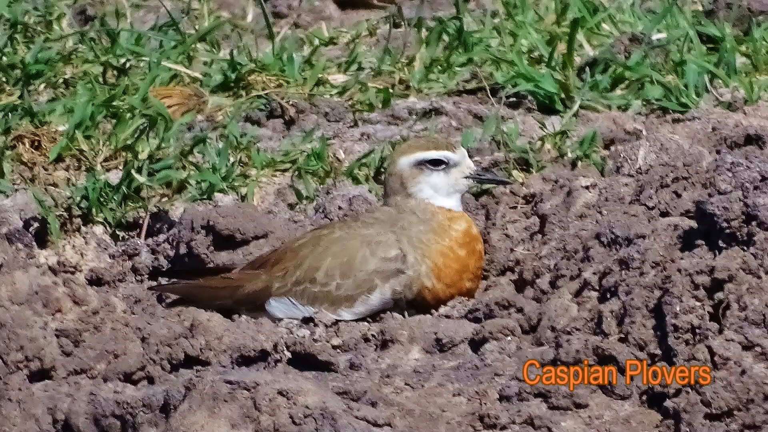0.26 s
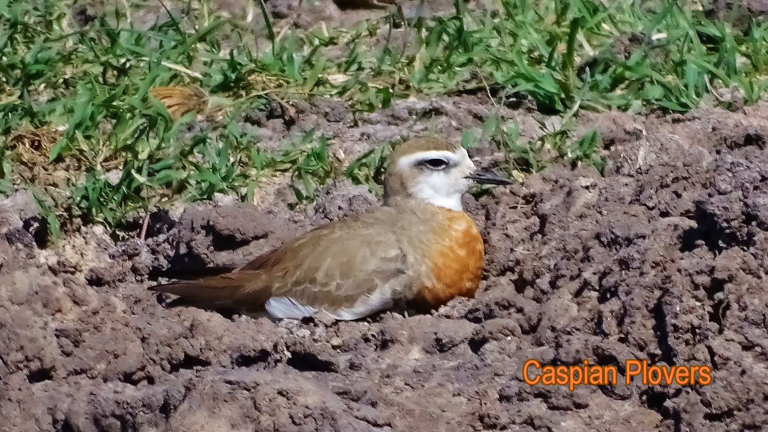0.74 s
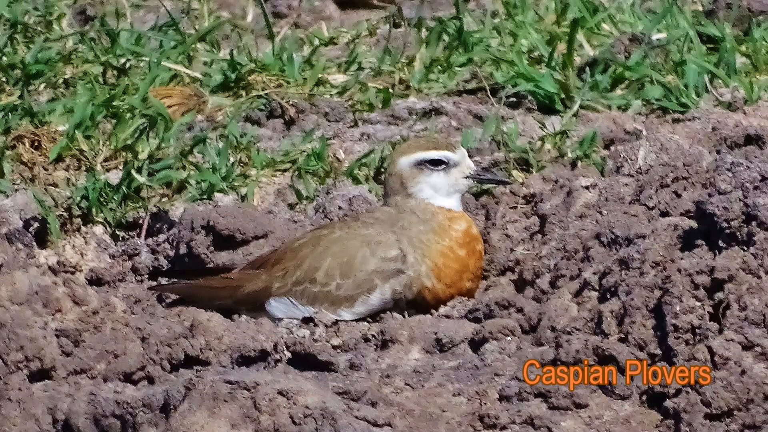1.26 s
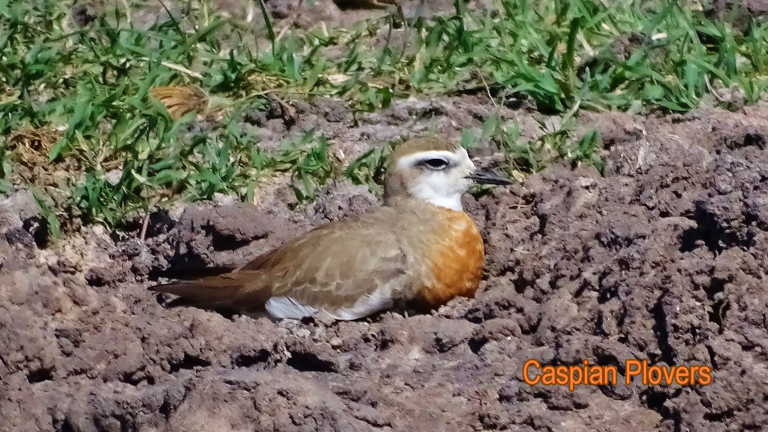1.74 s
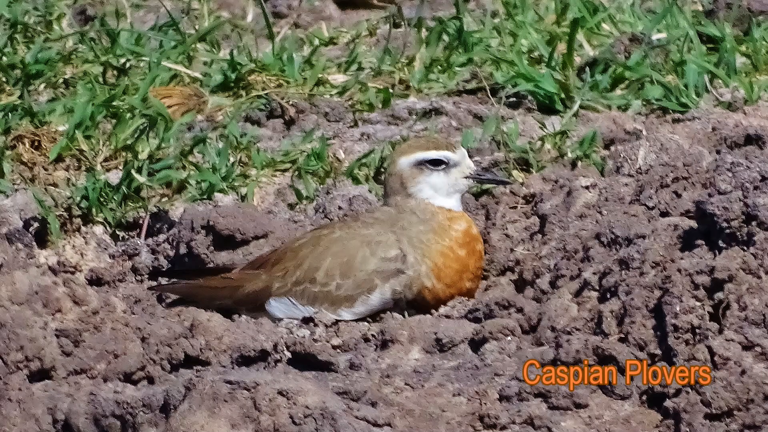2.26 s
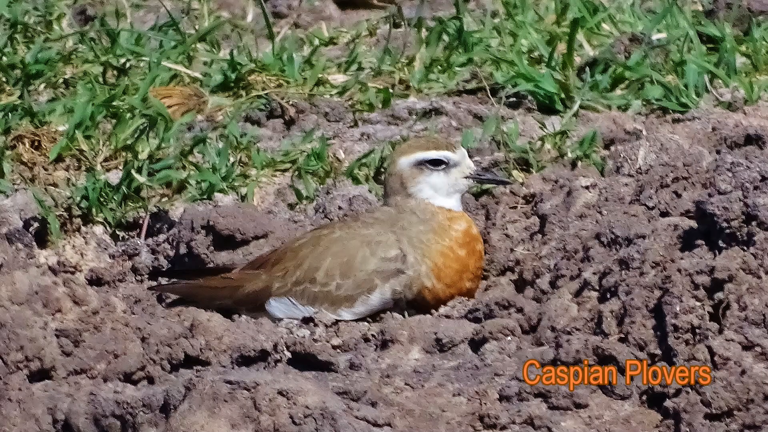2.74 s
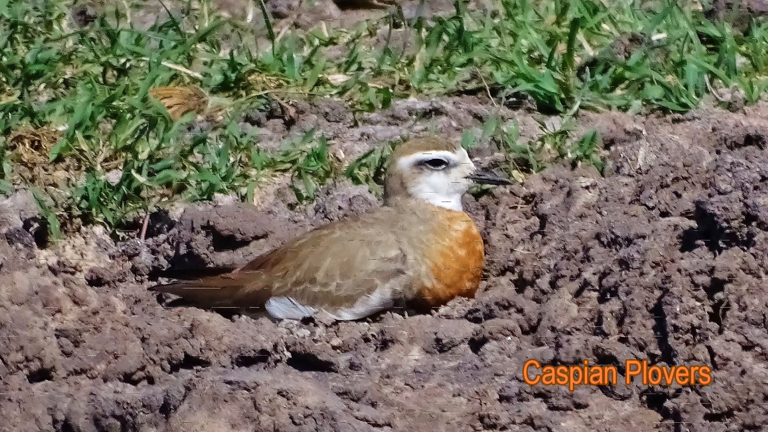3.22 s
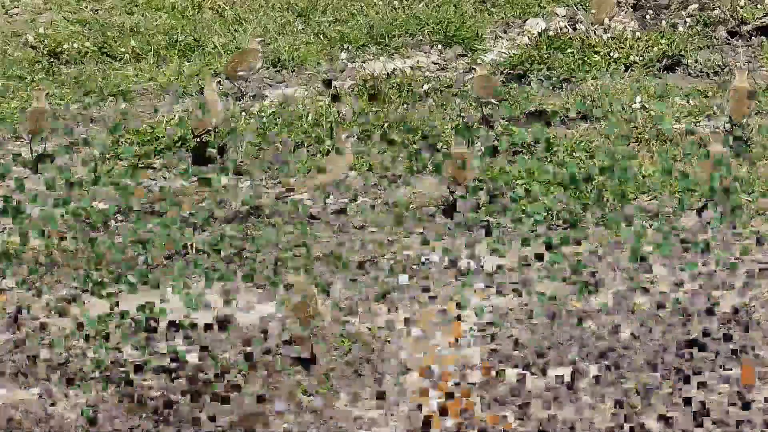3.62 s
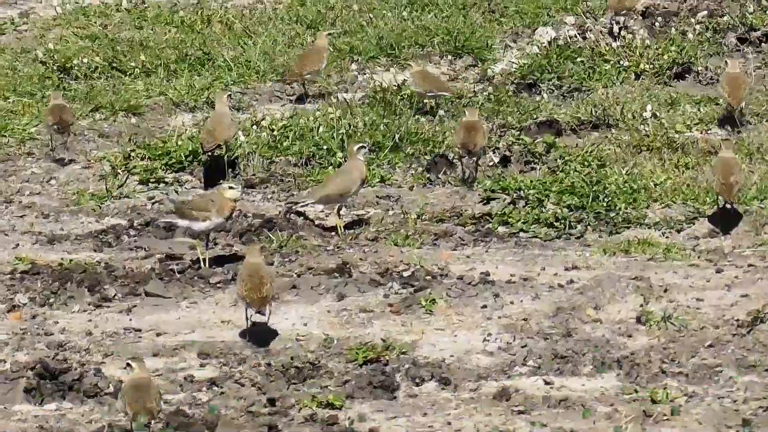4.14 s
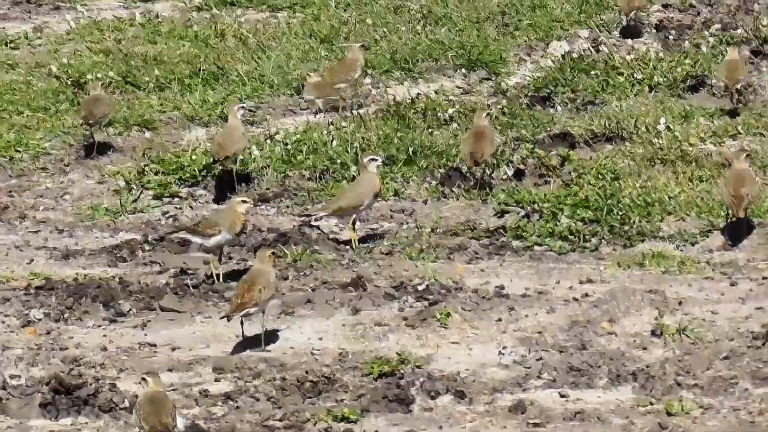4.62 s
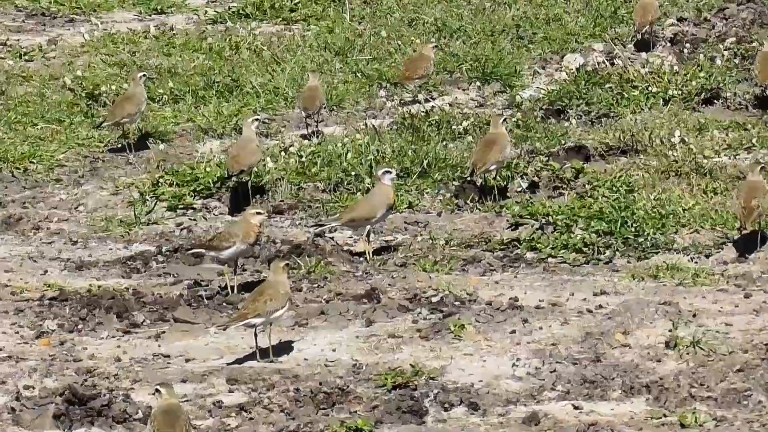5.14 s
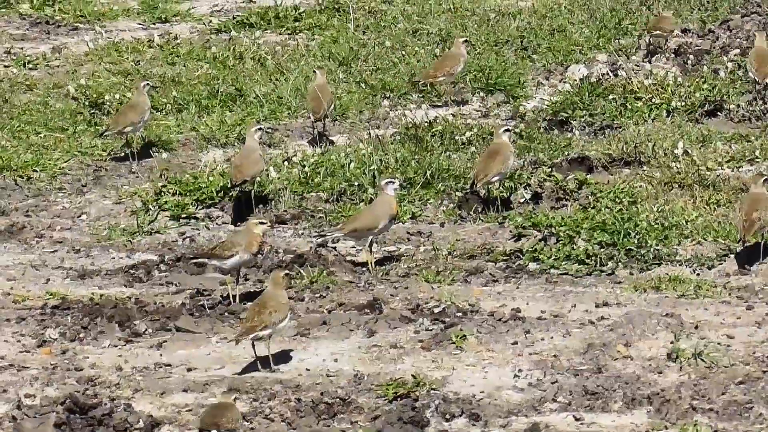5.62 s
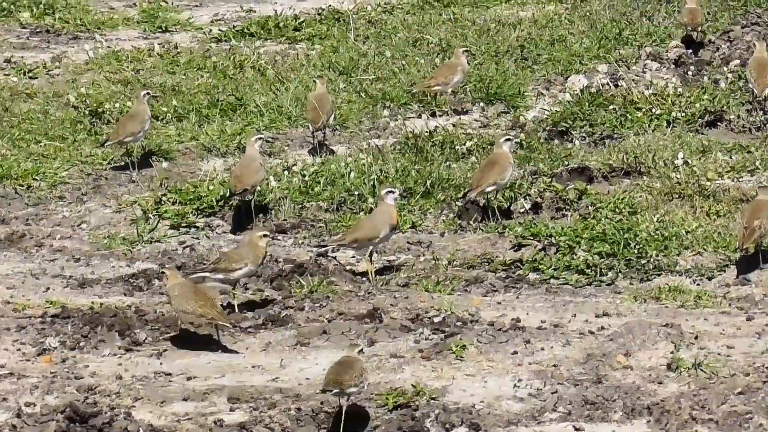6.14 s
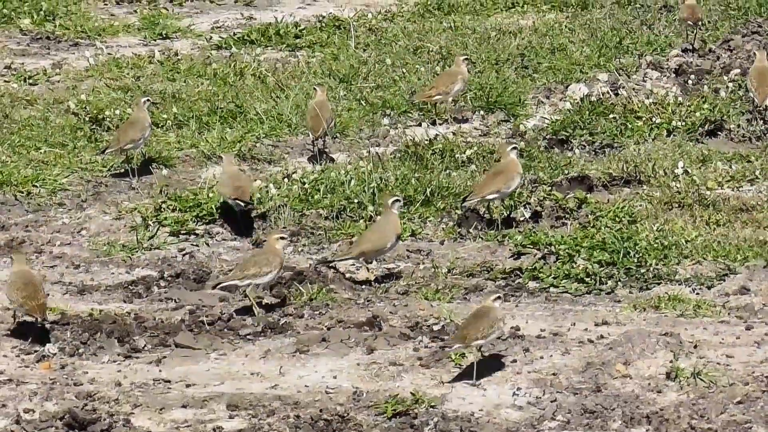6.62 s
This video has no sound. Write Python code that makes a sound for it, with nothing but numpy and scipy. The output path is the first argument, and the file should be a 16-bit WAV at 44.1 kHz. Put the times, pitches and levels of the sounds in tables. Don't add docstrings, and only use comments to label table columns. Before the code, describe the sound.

Small wading birds whip out sharp, high warbled chirps over a breezy, hissing grassland, with far songbird twitter and a soft dove cooing and rolling behind.

```python
import sys
import numpy as np
from scipy import signal
from scipy.fft import rfft, irfft
from scipy.io import wavfile
from scipy.ndimage import uniform_filter1d, map_coordinates

SR = 44100
rng = np.random.default_rng(int(sys.argv[2]) if len(sys.argv) > 2 else 0)


def invert_db(level):
    return 10 ** (np.asarray(level, dtype=float) / 20)


def dump_mix(stems):
    frames = np.atleast_2d(stems).T
    limited = np.clip(frames, -1, 1)
    pcm = np.round(limited * 32767).astype(np.int16)
    wavfile.write(sys.argv[1], SR, pcm)


N = 302967

# [f/Hz, density/dB]
AIR_SPECTRUM = [(15, -28), (25, -16.5), (191, 0), (407, -6), (540, -7), (763, -5.5), (989, -8), (1490, -16),
                (1770, -11), (2400, -19.5), (3050, -19.5), (4400, -23), (5720, -41), (9680, -120)]
# [f/Hz, density/dB]
GRASS_SPECTRUM = [(2590, -42.5), (4300, -29), (4850, -7.5), (5730, -4), (6410, -9), (7140, -18),
                  (7610, -23), (8050, -13.5), (8850, -3), (11000, -4.5), (13000, -10), (14800, -15),
                  (15900, -17)]
# [t/s, level/dB]
GRASS_SWELL = [(0, -55.5), (.3, -54), (.6, -50), (.9, -52.5), (1.2, -57), (1.6, -57), (2.0, -52.5),
               (2.4, -55.5), (3.2, -54), (4.2, -54), (5.2, -54), (6.0, -56), (6.87, -51)]
# [f/Hz, likeness 0..1]
EAR_LIKENESS = [(30, 0.3), (150, 0.99), (350, 0.71), (1500, 0.88), (3000, 1), (7000, 0.7), (9000, 0.7),
                (14000, 0.89)]
EARS = np.array([[.5], [-.5]])
# [t/ms, f/Hz, level/dB]
CROSSING_VOICES = [
    [(0, 6400, -15), (12, 5300, -5), (21, 4200, -7)],
    [(4, 2950, -17), (20, 4000, 0), (26, 3500, -6), (36, 3150, 3), (57, 2150, -12), (67, 2300, -12),
     (72, 3150, 2), (79, 3150, 4), (83, 2500, -13), (97, 1900, -16), (120, 1600, -21)],
    [(52, 4250, -18), (62, 4350, -16), (70, 4900, -21)],
    [(80, 4100, -7), (87, 4350, -10), (95, 3850, -4), (103, 3650, -3), (113, 3250, -11), (122, 3100, -6),
     (130, 3300, -13)],
    [(128, 2200, -10), (150, 3050, -13)],
]
# [t/ms, f/Hz, level/dB]
TUMBLING_VOICES = [
    [(13, 2700, -16), (24, 3350, -3), (29, 3050, -8), (33, 3250, 0), (37, 2700, -12), (46, 2250, -18)],
    [(37, 4450, -14), (44, 4600, -2), (51, 4300, -5), (57, 3750, -2), (64, 3200, 3), (78, 2950, -5),
     (85, 2600, -10), (89, 1850, -15), (103, 1600, -17)],
    [(92, 3300, -14), (101, 3250, -8), (115, 3000, -14)],
    [(124, 2350, -9), (146, 2900, -18)],
]
# [start t/s, level/dB, tempo stretch]
CROSSINGS = [
    (.923, -32.8, 1.0),
    (3.149, -41, 1.05),
]
# [start t/s, level/dB, tempo stretch]
TUMBLINGS = [
    (-.053, -34.5, 1.0),
    (2.398, -35, 1.0),
    (5.41, -40, 1.0),
]
# [start t/s, length/ms, start f/Hz, end f/Hz, level/dB]
FALLS = [(2.615, 36, 5170, 4150, -58), (3.888, 75, 5250, 3730, -53.5), (2.398, 7, 6440, 2980, -41),
         (4.421, 28, 6570, 5160, -41), (4.609, 70, 8900, 8720, -49), (4.7, 110, 9250, 9060, -53),
         (4.894, 16, 5300, 4100, -50), (4.91, 12, 4100, 2300, -56), (5.092, 56, 4500, 2840, -51.5),
         (5.39, 20, 5060, 3660, -49), (5.449, 12, 5400, 4100, -48), (5.49, 9.7, 2910, 2200, -49),
         (5.583, 20, 3950, 2890, -57.5), (5.393, 8, 6400, 5800, -52), (3.13, 15, 5600, 3400, -57),
         (3.152, 21, 6200, 4290, -44), (3.245, 34, 1900, 1550, -55), (3.241, 22, 4410, 3390, -48),
         (4.33, 18, 5170, 2900, -53), (.945, 8.8, 3880, 3100, -40), (3.668, 8, 3500, 2800, -39),
         (6.452, 12, 4000, 3700, -51), (6.694, 6, 4000, 2600, -50), (0.004, 7, 4400, 3500, -37),
         (.018, 10, 4700, 3700, -49), (.02, 6, 2900, 2400, -48), (3.684, 5.6, 4600, 3400, -43),
         (5.801, 40, 4020, 2160, -51), (5.985, 35, 3730, 2400, -59.5), (6.195, 72, 4170, 2640, -56.5),
         (6.438, 13, 6600, 4000, -49), (6.48, 33, 5000, 4880, -47.5), (6.733, 31.5, 4310, 2560, -44.5)]
# [start t/s, length/ms, start f/Hz, end f/Hz, level/dB]
RISES = [(2.16, 28, 4450, 4700, -59), (2.198, 30, 5200, 4950, -52), (4.6, 26, 3000, 3450, -57),
         (0.89, 16.3, 4700, 4900, -54), (3.218, 14, 2100, 3100, -50), (2.685, 21.5, 3860, 4900, -54),
         (2.72, 36, 3650, 3750, -58), (3.635, 31, 3940, 4420, -55), (3.955, 20, 3960, 4480, -58),
         (3.974, 10, 4580, 5300, -39), (4.352, 24, 2870, 3850, -43.5), (4.378, 6.2, 3500, 3620, -46),
         (3.28, 22.4, 1700, 2500, -60), (5.428, 10, 3200, 3850, -42), (5.1, 25, 3500, 4100, -55),
         (4.8, 31, 4250, 4500, -54.5), (4.843, 10, 4060, 5200, -52), (4.675, 22, 8720, 9300, -49),
         (5.155, 25.4, 2860, 3700, -51.5), (6.158, 24, 2980, 3570, -60.5), (6.27, 43, 2600, 3120, -54),
         (6.345, 69, 3600, 4050, -57), (6.56, 51, 2950, 3600, -53.5), (6.575, 46, 2750, 3420, -59),
         (6.6, 88, 3540, 3930, -49.5), (6.684, 12, 3630, 4540, -47), (6.3, 29, 2390, 2510, -55),
         (3.862, 22, 3220, 3700, -55.5)]
# [start t/s, length/ms, ends f/Hz, mid-note f/Hz, level/dB]
ARCHES = [(3.32, 20, 3950, 3800, -53), (3.354, 17, 4400, 4620, -54), (1.002, 8, 4360, 4300, -45),
          (3.34, 12, 4000, 4150, -59), (3.392, 15, 4680, 4860, -45), (3.416, 18, 4600, 4870, -43.5),
          (3.994, 32, 3130, 3520, -52), (4.44, 20, 4050, 4390, -50), (4.853, 42, 5280, 5420, -47),
          (5.853, 18, 2260, 2780, -52), (3.455, 20, 4800, 4900, -55), (6.513, 14, 8300, 8350, -49),
          (6.698, 12, 8900, 9000, -55), (.898, 15, 5350, 5450, -49), (5.44, 34, 3750, 3850, -52),
          (3.172, 9.4, 3190, 3600, -44)]
# [t/s, peak level/dB, f/Hz]
TAPS = [(0.061, -40, 1300), (0.473, -39.5, 1190), (0.99, -54, 2300), (1.004, -32.5, 950),
        (1.169, -34, 1050), (1.025, -42, 1000), (3.125, -46, 1800), (3.29, -43, 1100), (3.393, -37, 1500),
        (3.44, -43, 1400), (5.457, -46, 1700), (5.605, -45, 1300), (3.32, -28, 1030), (3.388, -32, 1750),
        (3.417, -32, 900), (2.226, -47, 1700), (3.557, -43, 1900), (3.612, -38, 1900), (3.75, -44, 1500),
        (3.799, -39, 1010), (3.8, -37, 2500), (3.801, -39.5, 486), (5.478, -42, 721), (5.544, -35, 1100),
        (5.585, -43.5, 836), (5.741, -38, 1110), (5.841, -38.5, 1170), (6.179, -40, 796), (6.406, -38, 830),
        (6.492, -37, 850), (6.662, -36.5, 939), (6.677, -35, 980)]
# [t/s, peak level/dB]
SNAPS = [(.062, -36), (.104, -35), (.1856, -33), (.3393, -34), (.4086, -33), (.5892, -37), (0.664, -32),
         (1.61, -31), (1.102, -32), (2.048, -26.5), (2.18, -31), (2.685, -30), (3.088, -27),
         (3.1834, -24.5), (3.204, -19), (3.5576, -21), (5.3323, -32.5), (5.4191, -32), (5.478, -29.5),
         (5.547, -28), (5.581, -31), (5.8007, -32), (6.49, -24.5)]
# [t/s, peak level/dB]
BUMPS = [
    (0.472, -23.5),
    (1.117, -24),
    (3.18, -31),
    (3.388, -22),
    (3.808, -25),
    (5.285, -27.5),
    (6.179, -27),
    (6.331, -25),
]
# [start t/s, echo level/dB, left-right difference/dB, rasp level/dB]
PLACES = [(1.137, -15.5, 0.5, -6.5), (2.295, -7, 3.5, -4), (2.764, -14.5, 0.5, -7), (3.662, -12, 3, -0.5),
          (4.24, -12, 3, 0), (4.374, -8, 1.2, -20.0), (4.42, -9, 1, -17), (4.706, -2, -4, -2),
          (4.979, -13, 3, -2.5), (5.861, 0.5, 2, -10), (6.27, 1, 4, -20.0), (6.39, -6, 1.5, -20.0),
          (6.467, -6, 1.5, 2), (6.711, 9, 4, -31)]
# [start t/s, start f/Hz, hold f/Hz, first dip f/Hz, later dips f/Hz]
CHIRPS = [
    (1.14, 5584, 5700, 4287, 5720),
    (2.3, 6430, 5260, 4270, 4840),
    (2.765, 5320, 5570, 4280, 5730),
    (3.6636, 6870, 5240, 2850, 5035),
    (4.239, 6430, 7140, 6440, 5160),
    (4.98, 5823, 5560, 3570, 5100),
    (5.865, 6150, 5476, 3870, 5140),
    (6.711, 5320, 5190, 4310, 4910),
]
# [tempo stretch, opening level/dB, middle level/dB, closing level/dB, octave level/dB]
BURSTS = [
    (1.2, -18, -11, -24, -21),
    (1.01, -24, -22, -21.5, -16),
    (1.2, -18, -9, -16, -16),
    (1.02, -12, -13, -30, -11.5),
    (1.04, -9, -15, -22, -11),
    (.99, -8, -9, -9.5, -11),
    (1.02, -19.5, -26.5, -16.5, -18),
    (1.02, -30.5, -26.5, -33.5, -29),
]
TURNS_MS = [0, 4.5, 8.5, 15, 22, 28, 33.5, 38, 46]
# [f/Hz, lead per difference/(rad/dB)]
PORTS = [(4500, 0.15), (5900, .43), (7200, 0.75), (7400, -1.5), (10300, 0.1), (14000, -0.2)]
# [centre t/s, length/ms, start f/Hz, end f/Hz, peak level/dB]
STROKES = [(4.377, 3.3, 3700, 6200, -28), (4.3855, 3.5, 3600, 6300, -29), (4.452, 5.5, 5380, 6400, -29),
           (4.475, 8.5, 6500, 5900, -32), (4.7125, 5.2, 5300, 5100, -35), (4.729, 4.6, 5430, 5100, -33),
           (4.7405, 4.7, 5440, 5350, -41), (4.757, 8.7, 4780, 5400, -34), (4.775, 3.8, 5200, 5350, -32),
           (6.276, 5.7, 5180, 5460, -36.5), (6.4, 10, 5640, 6160, -37), (6.415, 5.7, 5920, 6740, -26),
           (6.472, 7.1, 6760, 5040, -22), (6.509, 2.9, 5700, 6800, -16)]
# [centre t/s, length/ms, start f/Hz, end f/Hz, peak level/dB]
SWELLS = [(1.1442, 4.6, 5750, 5480, -9.5), (1.148, 1.6, 5320, 5030, -13.5), (1.153, 1.3, 5400, 6200, -11),
          (1.1642, 3.6, 6070, 5600, -4), (1.1763, 4, 6200, 6000, -15.5), (2.7681, 3.9, 5390, 5440, -6),
          (2.777, 1.56, 5370, 5860, -6.5), (2.7872, 4.3, 6240, 5580, -3), (2.8003, 3.5, 5600, 6500, -4.5),
          (2.804, 1.7, 6200, 6160, -8), (3.665, 2.2, 6500, 5860, -4), (3.6682, 2.6, 5940, 5240, -7.5),
          (3.681, 2.2, 6540, 6000, -6), (3.683, 1.9, 6070, 5460, -7), (3.6855, 4.05, 5300, 5180, -6.5),
          (3.6883, 2.5, 5500, 6250, -4.5), (3.689, 4, 6130, 6370, -7), (4.2435, 8, 6270, 5500, -19),
          (4.249, 5, 6400, 6550, -14), (4.254, 5, 6570, 6940, -8), (4.263, 4, 5310, 5560, -7.5),
          (4.2665, 2.5, 5930, 5600, -12), (4.272, 3.1, 5340, 5200, -8), (4.2745, 2.1, 5120, 5970, -9.5),
          (4.2798, 1.6, 5530, 5870, -15), (4.984, 5.4, 5652, 5370, 1), (4.991, 2.8, 5200, 5900, -1.5),
          (4.9989, 3.5, 6250, 5200, -10), (5.0021, 2, 4980, 5860, -7), (5.006, 5, 5860, 5400, -12),
          (5.0108, 2.6, 5700, 5100, -2.5), (5.0146, 2.15, 5200, 5870, -3.5), (5.018, 5, 6320, 6380, -7),
          (5.024, 5.1, 5980, 5700, -12.5), (5.03, 6, 5900, 5470, -15), (5.868, 2.85, 5920, 5470, -17)]
# [centre t/s, length/ms, start f/Hz, end f/Hz, peak level/dB]
CRESTS = [
    (1.158, 8.6, 8700, 8060, -24),
    (1.170, 7, 8000, 8640, -22),
    (2.781, 5, 8300, 8300, -22),
    (2.793, 4, 8200, 8500, -26),
    (4.9955, 3, 8000, 8500, -24),
    (5.0062, 4.4, 8400, 8400, -18),
    (3.667, 8, 14500, 8800, -20),
    (3.682, 5.7, 15000, 10000, -17),
    (4.9975, 4.5, 15200, 10800, -17),
    (4.2555, 4, 8800, 9000, -26),
]
# [start t/s, length/ms, mid-coo f/Hz, level/dB]
COOS = [
    (1.272, 100, 960, -54),
    (3.105, 103, 970, -52.5),
    (4.54, 103, 930, -58.5),
    (4.782, 69, 920, -53.5),
    (5.965, 89, 887, -55),
    (6.18, 64, 864, -55),
]
# [start t/s, last pulse t/s, f/Hz, level/dB, pulse rate/Hz]
ROLLS = [
    (1.512, 1.895, 820, -45, 30.5),
    (3.33, 3.713, 820, -46, 30),
    (4.86, 5.177, 820, -47, 30.5),
    (6.26, 6.578, 820, -49, 29.5),
]


def unit(x):
    return x / np.sqrt(np.mean(x ** 2) + 1e-20)


def along(points, hz):
    f, v = np.transpose(points)
    return np.interp(np.log(hz + 1), np.log(f + 1), v)


def add(track, s, sound):
    part = track[..., max(round(s * SR), 0):][..., :sound.shape[-1]]
    part += sound[..., :part.shape[-1]]


def tone(hz, octave_db):
    phase = 2 * np.pi * np.cumsum(hz) / SR + rng.uniform(0, 2 * np.pi)
    return np.sin(phase) + invert_db(octave_db) * np.sin(2 * phase)


def bend(ms, start_hz, middle_hz, end_hz):
    u = np.linspace(-1, 1, round(ms * SR / 1000))
    slope = (end_hz - start_hz) / 2
    bow = (start_hz + end_hz) / 2 - middle_hz
    return u, middle_hz + slope * u + bow * u ** 2


def blur(x, depth, size):
    waving = unit(uniform_filter1d(rng.standard_normal(len(x)), size=size))
    return x * (1 + depth * waving)


def echo(x, near_t60, far_t60, far_db):
    t = np.arange(SR // 2) / SR
    tail = rng.standard_normal((2, len(t))) * (1 - np.exp(-t / 0.0027))
    tail[1] = 0.87 * tail[0] + 0.62 * tail[1]
    tail = tail * (invert_db(-60 * t / near_t60) + invert_db(far_db - 60 * t / far_t60))
    return signal.fftconvolve(np.atleast_2d(x), tail / np.linalg.norm(tail[0]), axes=1)


def microphone_db(hz):
    colour = along(GRASS_SPECTRUM, hz)
    return np.where(hz < 5000, np.maximum(colour, -18), colour)


def through_microphone(x):
    hz = np.fft.rfftfreq(x.shape[-1], 1 / SR)
    return irfft(rfft(x) * invert_db(microphone_db(hz)), x.shape[-1])


def rush(spectrum, patchy_db):
    z = signal.stft(rng.standard_normal((2, N + 8192)), nperseg=512)[2]
    patches = uniform_filter1d(rng.standard_normal(z.shape[1:]), size=8, axis=0)
    patches = uniform_filter1d(patches, size=10, axis=1)
    pair = signal.istft(z * invert_db(patchy_db * unit(patches)), nperseg=512)[1]
    hz = np.fft.rfftfreq(pair.shape[1], 1 / SR)
    turn = np.arccos(np.clip(along(EAR_LIKENESS, hz), -1, 1)) / 2
    coloured = rfft(pair) * invert_db(along(spectrum, hz)) * [np.cos(turn), np.sin(turn)]
    mid, side = irfft(coloured, pair.shape[1])[:, :N]
    return unit(np.array([mid + side, mid - side]))


def plain():
    stirs = rng.random((150, 2))
    kicks = np.bincount((stirs[:, 0] * N).astype(int), 1.5 * stirs[:, 1] ** 2, N)
    decay = invert_db(-60 * np.arange(SR // 25) / SR / 0.07)
    crackle = 1 + signal.fftconvolve(kicks, decay)[:N]
    wash = rush(AIR_SPECTRUM, patchy_db=2.0)
    rumble = uniform_filter1d(wash, size=70)
    air = invert_db(-51.7) * unit(rumble + crackle * (wash - rumble))
    breeze_db = np.interp(np.arange(N) / SR, *np.transpose(GRASS_SWELL))
    grass = invert_db(breeze_db) * rush(GRASS_SPECTRUM, patchy_db=1.3)
    return air + grass * crackle ** 0.57


def twitters():
    notes = []
    for voices, sung in (CROSSING_VOICES, CROSSINGS), (TUMBLING_VOICES, TUMBLINGS):
        for s, db, stretch in sung:
            for voice in voices:
                ms, pitch, level_db = np.transpose(voice)
                ms = ms * stretch
                t = np.arange(ms[0] - 2, ms[-1] + 2, 1000 / SR)
                hz = uniform_filter1d(np.interp(t, ms, pitch), size=90, mode="nearest")
                notes.append((s + t[0] / 1000, hz, db + np.interp(t, ms, level_db), 1.3))
    return notes


def slides():
    notes = []
    for table, early in (FALLS, 0.6), (RISES, 0.55):
        for s, ms, start_hz, end_hz, db in table:
            middle_hz = start_hz + early * (end_hz - start_hz)
            notes.append((s - .0025, bend(ms + 5, start_hz, middle_hz, end_hz)[1], db, 2.5))
    for s, ms, ends_hz, middle_hz, db in ARCHES:
        notes.append((s - .0025, bend(ms + 5, ends_hz, middle_hz, ends_hz)[1], db, 2.5))
    return notes


def songbirds():
    out = np.zeros((2, N))
    for s, hz, db, flutter_db in twitters() + slides():
        u = np.linspace(-1, 1, len(hz))
        seconds = len(hz) / SR
        side, *knots = rng.standard_normal(51)
        flutter = invert_db(flutter_db * map_coordinates(np.array(knots), [np.arange(len(hz)) / SR / .0045]))
        edge = np.clip((1 - np.abs(u)) * seconds / .009, 0, 1)
        pan = 0.9 * side * np.array([[1], [-1]])
        sound = invert_db(db + pan) * edge * flutter * tone(hz, -31.0)
        add(out, s, sound[:, max(-round(s * SR), 0):])
    blurred = blur(out.mean(axis=0), depth=.6, size=60)
    return out + invert_db(-6.2) * echo(blurred, near_t60=0.058, far_t60=0.32, far_db=-13)[:, :N]


def ticks():
    out = np.zeros((2, N))
    t = np.arange(SR // 25) / SR
    for s, db, hz in TAPS:
        ring = np.sin(2 * np.pi * hz * t) * (1 - np.exp(-t / 0.00031))
        add(out, s, invert_db(db + 7.5 - 60 * t * hz / 9) * ring)
        crack = uniform_filter1d(uniform_filter1d(rng.standard_normal(len(t)), size=8), size=8)
        add(out, s, invert_db(db + 4 - 60 * t / .012) * crack)
    for s, db in SNAPS:
        grit = rng.standard_normal(len(t)) + 0.28 * rng.standard_normal((2, len(t)))
        add(out, s, invert_db(db - 3) * through_microphone(grit * invert_db(-60 * t / 0.03)))
    for s, db in BUMPS:
        thud = np.sin(2 * np.pi * 215 * t) * (1 - np.exp(-t / 0.0062))
        add(out, s, invert_db(db - 60 * t / 0.034) * thud)
    return out


def warble(start_hz, hold_hz, dip_hz, later_hz, stretch, opening_db, middle_db, closing_db, octave_db):
    top_hz, last_hz, end_hz = 8500, 6560, 5700
    throat_hz, above_width_hz, below_width_hz = 5900, 670, 1350
    rising_db, unsteady_db = -3.5, 4.5
    attack_ms, fade_from_ms, fade_db_per_ms = 3.5, 38.2, 2.5
    turn_hz = [start_hz, hold_hz, dip_hz, top_hz, later_hz, top_hz, later_hz, last_hz, end_hz]
    ms = np.arange(0, TURNS_MS[-1] + 8, 1000 / SR / stretch)
    turns = np.arange(len(TURNS_MS))
    step = np.interp(ms, TURNS_MS, turns)
    eased = step - 0.73 * np.sin(2 * np.pi * step) / (2 * np.pi)
    hz = np.interp(eased, turns, turn_hz)
    tops = np.array(TURNS_MS)[[3, 3, 5, 5]] + [-1, 1, -1, 1]
    effort_db = np.interp(ms, tops, [opening_db, middle_db, middle_db, closing_db])
    effort_db -= fade_db_per_ms * np.maximum(ms - fade_from_ms, 0)
    effort_db += uniform_filter1d(rising_db * (np.gradient(hz) > 0), size=40)
    effort_db += unsteady_db * map_coordinates(rng.standard_normal(64), [ms / 1.623])
    width_hz = np.where(hz > throat_hz, above_width_hz, below_width_hz)
    throat = 1 / np.sqrt(1 + ((hz - throat_hz) / width_hz) ** 2)
    edges = np.clip(ms / attack_ms, 0, 1) ** 2 * np.clip((ms[-1] - ms) / 4, 0, 1)
    return invert_db(effort_db) * throat * edges * tone(hz, octave_db)


def wader_voices():
    starts = [row[0] for row in PLACES]
    calls = np.zeros((len(PLACES), SR // 8))
    lead = .01
    for (s, *shape), delivery in zip(CHIRPS, BURSTS):
        k = np.searchsorted(starts, s + .005) - 1
        add(calls[k], s - starts[k] + lead, warble(*shape, *delivery))
    for table, octave_db in (STROKES + CRESTS, -31), (SWELLS, -21.5):
        for s, ms, start_hz, end_hz, db in table:
            k = np.searchsorted(starts, s) - 1
            u, hz = bend(1.3 * ms, start_hz, (start_hz + end_hz) / 2, end_hz)
            swell = np.abs(np.cos(u * np.pi / 2)) ** 1.4
            stroke = invert_db(db + .7) * swell * tone(hz, octave_db)
            add(calls[k], s - starts[k] + lead - len(u) / SR / 2, stroke)
    return calls


def at_the_ports(voice, pan_db):
    hz = np.fft.rfftfreq(len(voice), 1 / SR)
    arrival = np.exp(1j * EARS * pan_db * along(PORTS, hz)) * invert_db(-1.1 * EARS * pan_db * (hz > 7300))
    delay = rng.uniform(0.0043, 0.0049, (3, 2, 1))
    bounce = invert_db(-12.5) * np.exp(-2j * np.pi * hz * delay).sum(axis=0) / 2
    return through_microphone(irfft(rfft(voice) * (arrival + bounce), len(voice)))


def waders():
    out = np.zeros((2, N))
    scatter = 0.77
    for (s, echo_db, pan_db, rasp_db), voice in zip(PLACES, wader_voices()):
        effort = uniform_filter1d(np.abs(voice), size=60)
        voice = voice + invert_db(rasp_db - 10.0) * effort * rng.standard_normal(len(voice))
        call = at_the_ports(voice, pan_db)
        blurred = through_microphone(blur(voice, scatter, size=22) / np.hypot(1, scatter))
        add(out, s - .01, invert_db(pan_db * EARS) * call)
        add(out, s - .01, invert_db(echo_db) * echo(blurred, near_t60=0.098, far_t60=0.5, far_db=-6.0))
    return out


def dove():
    out = np.zeros(N)
    for s, ms, middle_hz, db in COOS:
        u, hz = bend(ms, 710, middle_hz, 776)
        add(out, s, invert_db(db + 15.6 * u ** 2 + 3.5 * u) * (1 - u ** 8) * tone(hz, -33))
    sag_s, sag_db, sag_hz = .26, -4, 55
    for s, last, centre_hz, db, rate in ROLLS:
        t = np.arange(s, last + .5 / rate, 1 / SR)
        beat = 2 * np.pi * rate * (t - last) + .3 * np.sin(2 * np.pi * 9 * (t - last))
        depth = np.clip((t - s) / 0.053, 0, 1)
        onset = np.clip((t - s) / .01, 0, 1)
        pulses = (1 - depth * (1 - np.cos(beat)) / 2) ** 1.2 * onset
        sag = np.sin(np.pi * np.clip((t - s) / sag_s, 0, 1))
        pulses = pulses * invert_db(sag_db * sag)
        hz = centre_hz + 15 - sag_hz * sag - 115 * depth * np.sin(beat)
        add(out, s, invert_db(db + 1.5) * pulses * tone(hz, -30))
    direct = invert_db([[1.2], [-1.2]]) * out
    return direct + invert_db(-8.5) * echo(out, near_t60=0.087, far_t60=0.22, far_db=-12)[:, :N]


def scene():
    return plain() + songbirds() + ticks() + waders() + dove()


def band_limit(x):
    return signal.sosfilt(signal.butter(12, 16470, fs=SR, output="sos"), x)


def record(dry):
    hz = np.fft.rfftfreq(N, 1 / SR)
    dry = irfft(rfft(dry) * (hz < 15900), N)
    limited = dry / (1 + np.abs(dry / .8) ** 4) ** (1 / 4)
    mix = irfft(rfft(limited) * (hz < 16330), N)
    return band_limit(mix)


dry = scene()
out = record(dry)
dump_mix(out)
```